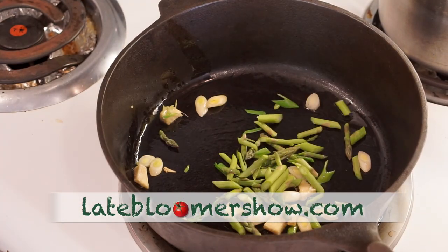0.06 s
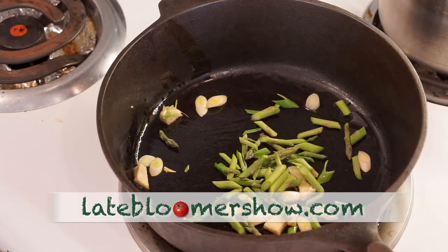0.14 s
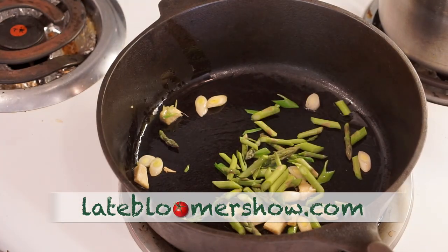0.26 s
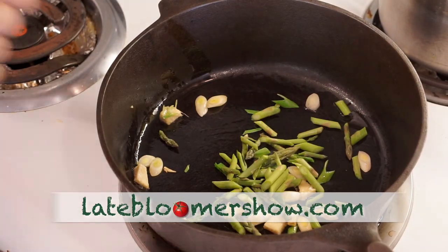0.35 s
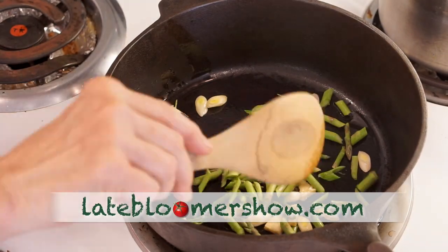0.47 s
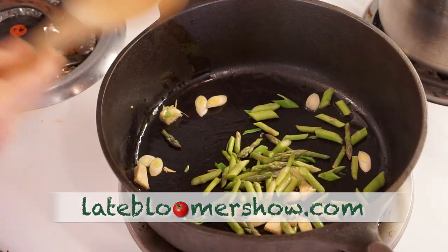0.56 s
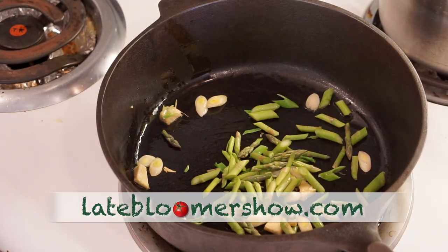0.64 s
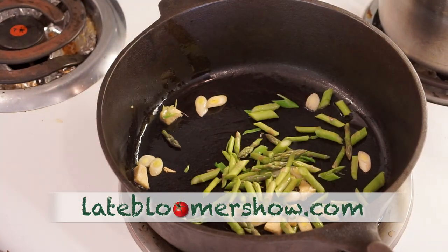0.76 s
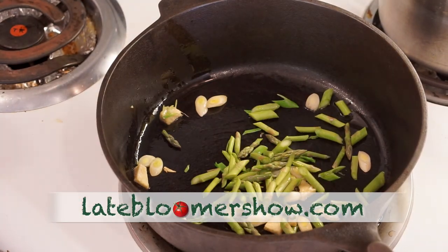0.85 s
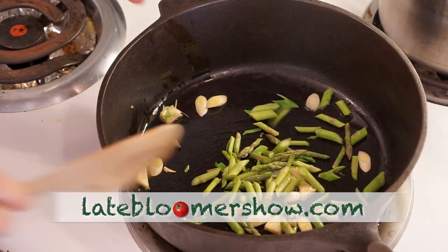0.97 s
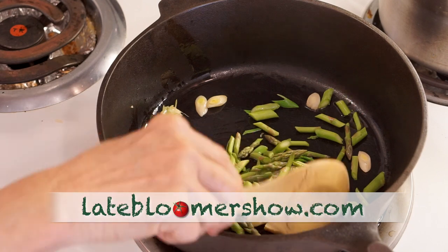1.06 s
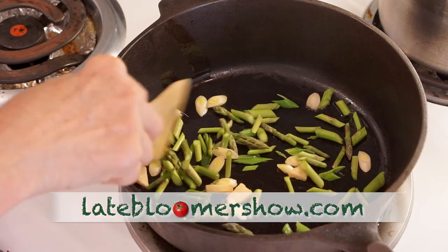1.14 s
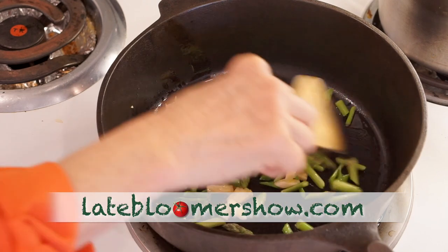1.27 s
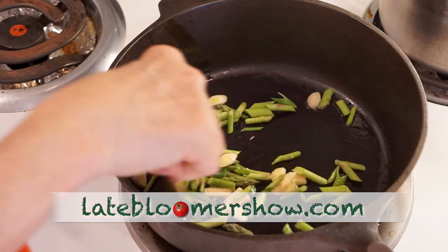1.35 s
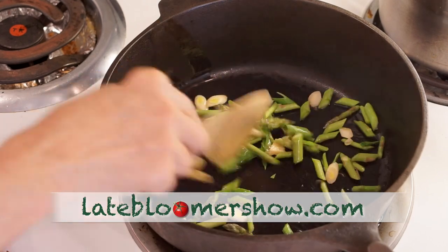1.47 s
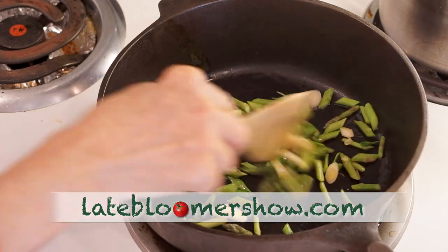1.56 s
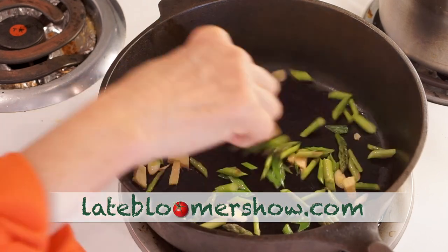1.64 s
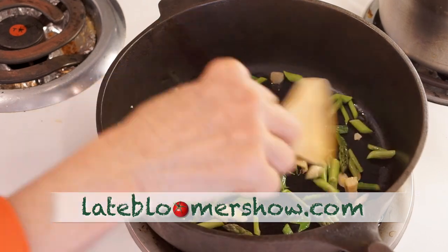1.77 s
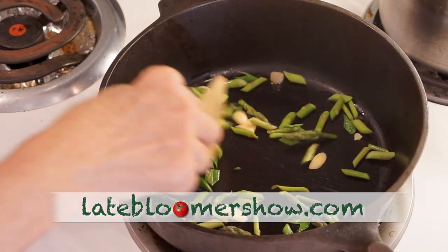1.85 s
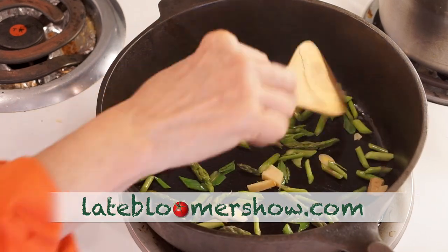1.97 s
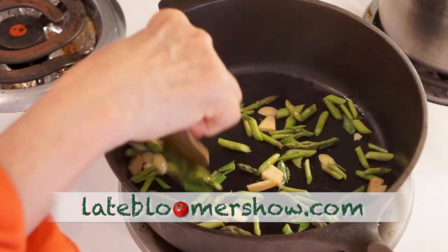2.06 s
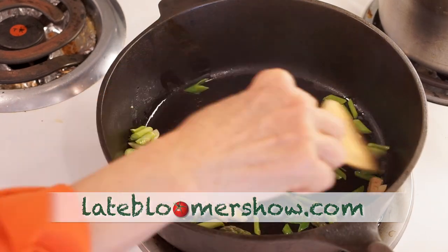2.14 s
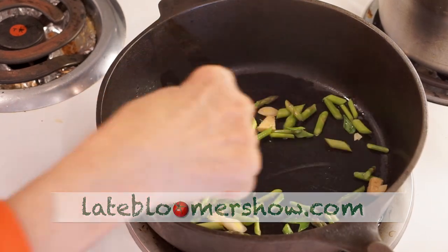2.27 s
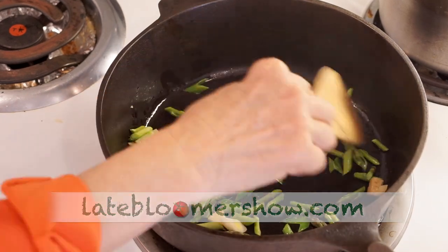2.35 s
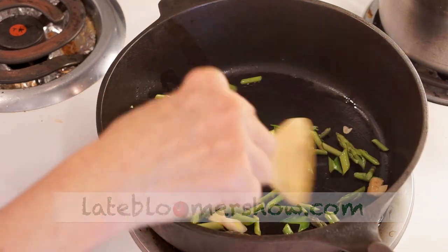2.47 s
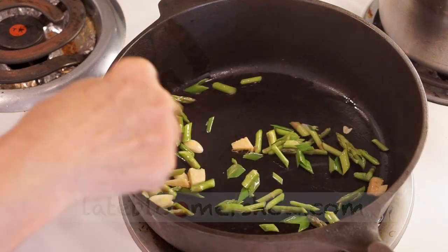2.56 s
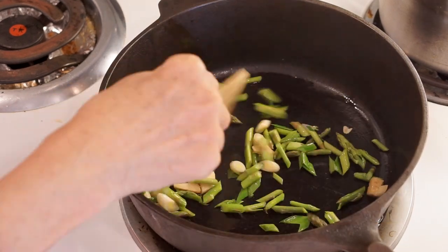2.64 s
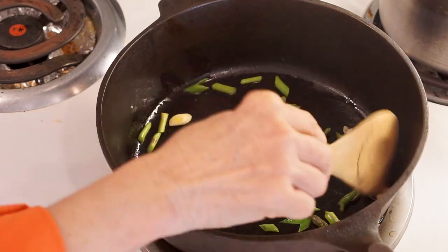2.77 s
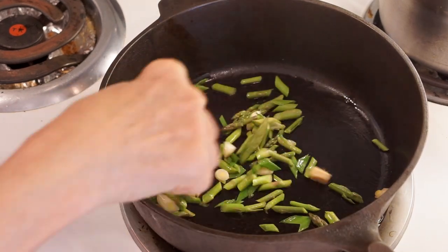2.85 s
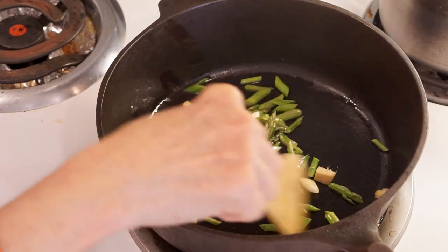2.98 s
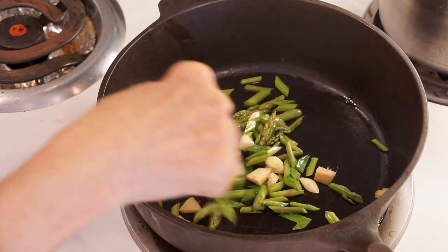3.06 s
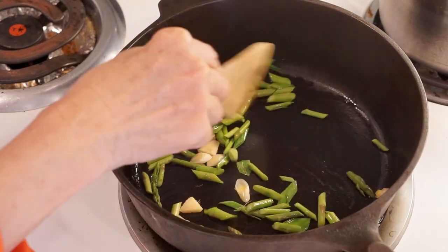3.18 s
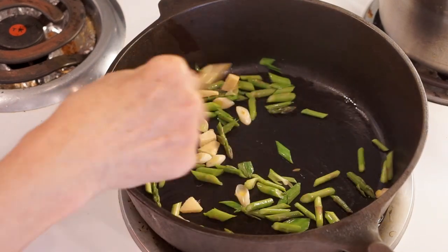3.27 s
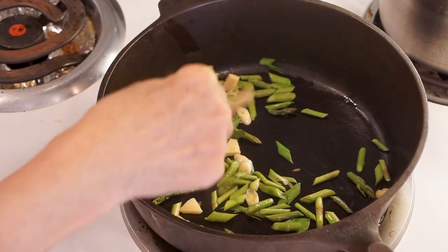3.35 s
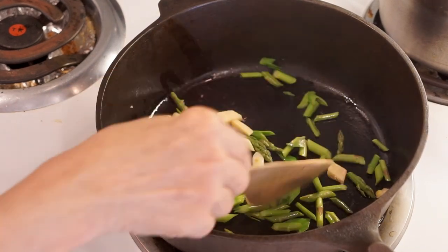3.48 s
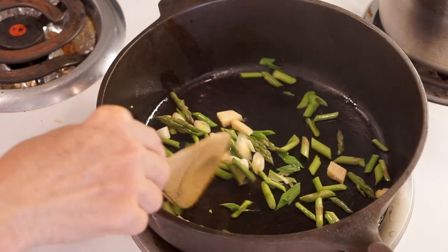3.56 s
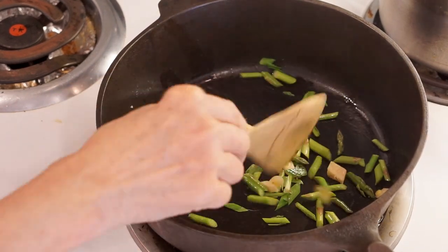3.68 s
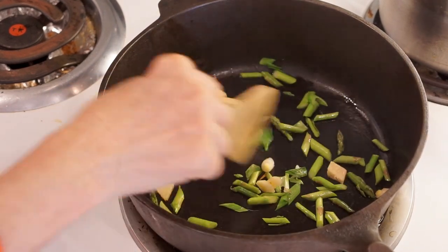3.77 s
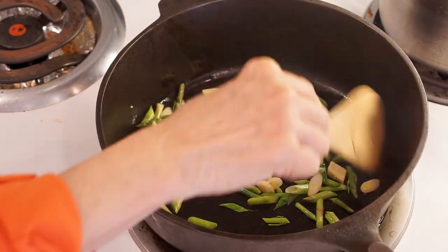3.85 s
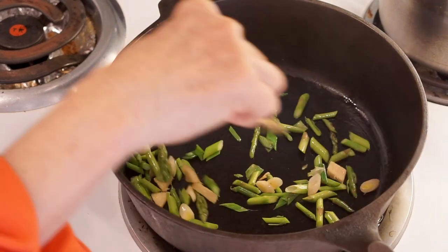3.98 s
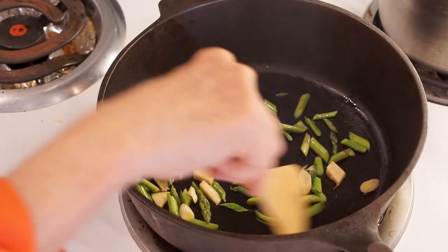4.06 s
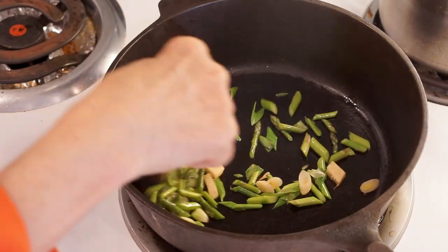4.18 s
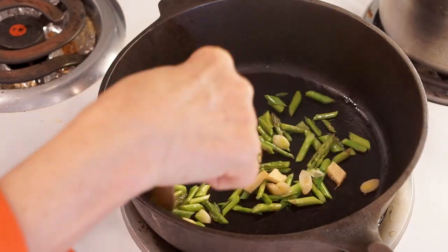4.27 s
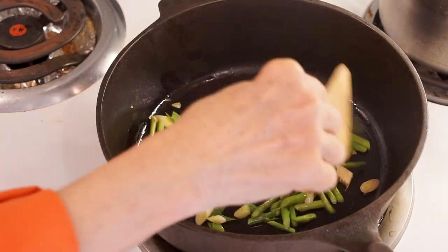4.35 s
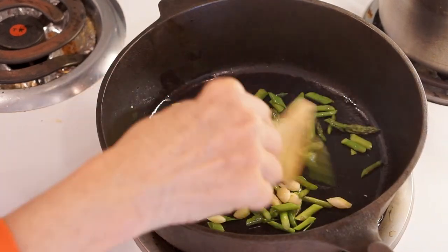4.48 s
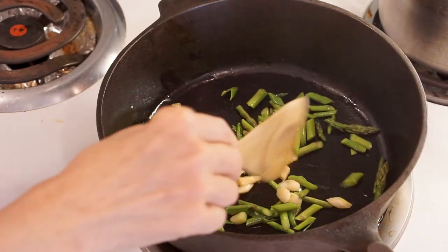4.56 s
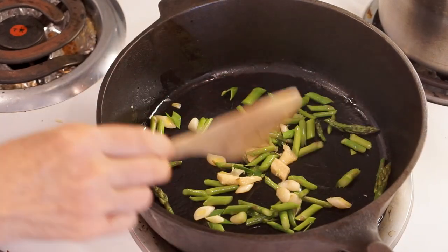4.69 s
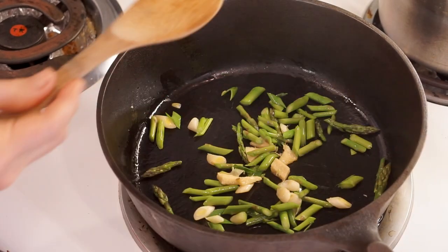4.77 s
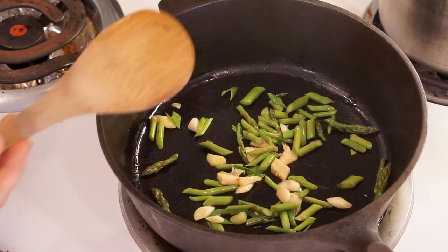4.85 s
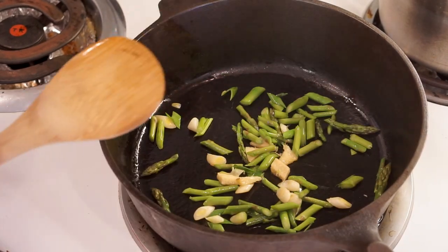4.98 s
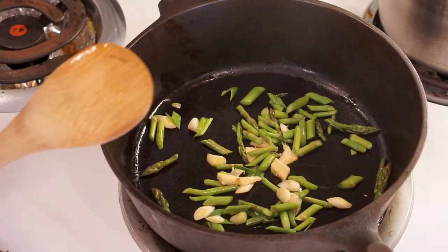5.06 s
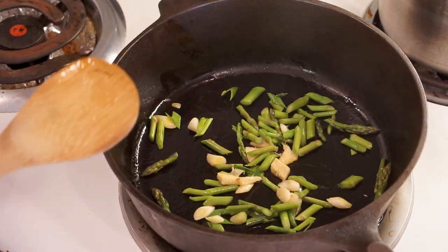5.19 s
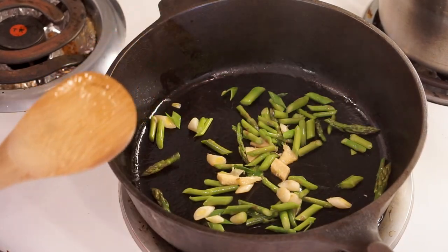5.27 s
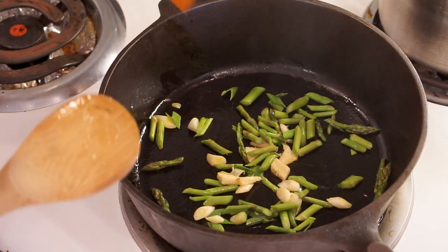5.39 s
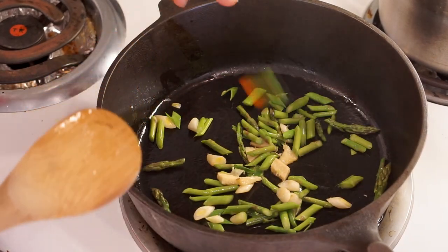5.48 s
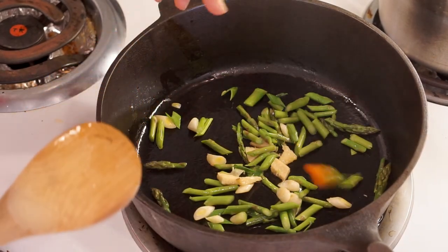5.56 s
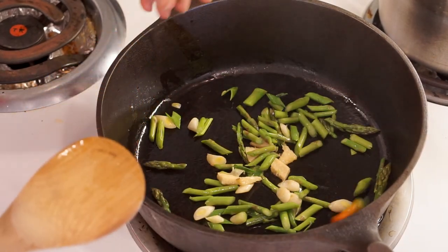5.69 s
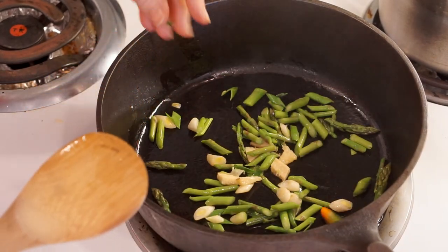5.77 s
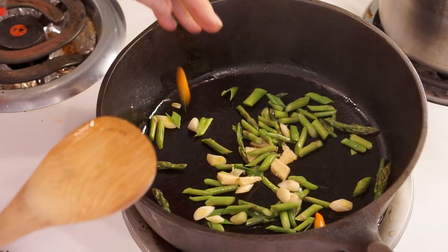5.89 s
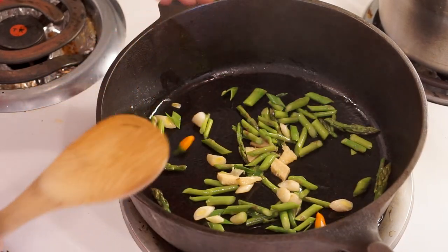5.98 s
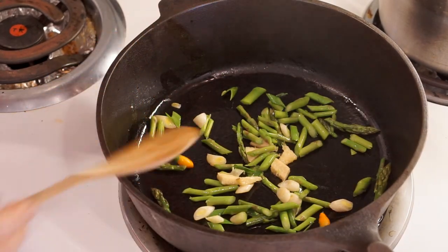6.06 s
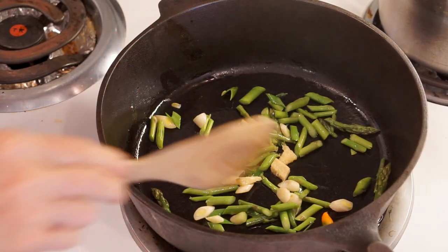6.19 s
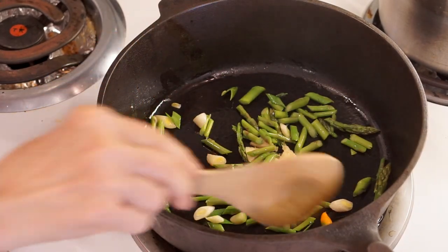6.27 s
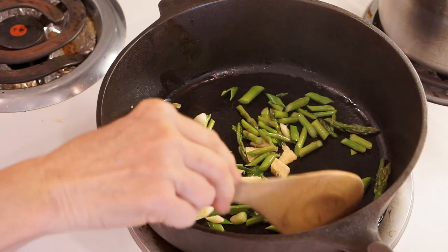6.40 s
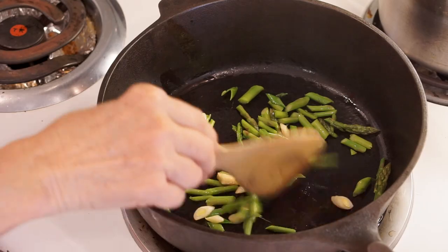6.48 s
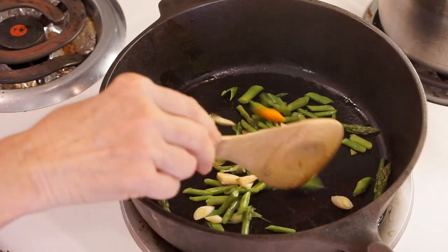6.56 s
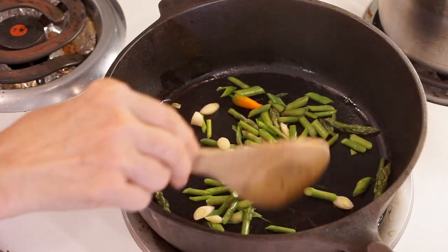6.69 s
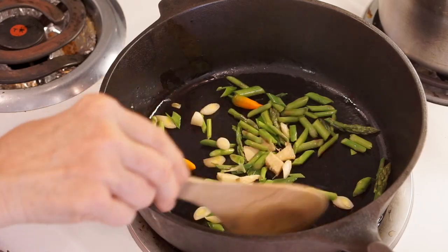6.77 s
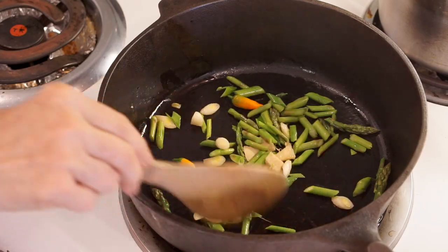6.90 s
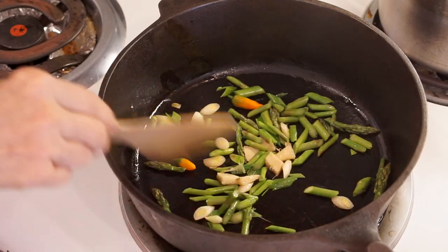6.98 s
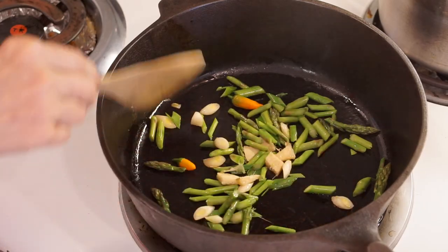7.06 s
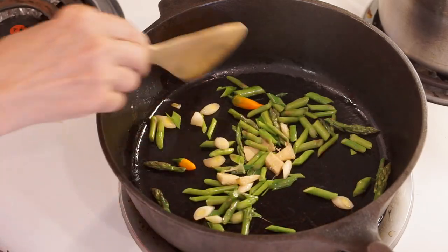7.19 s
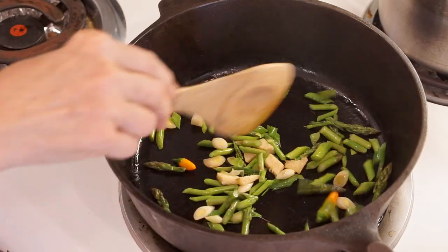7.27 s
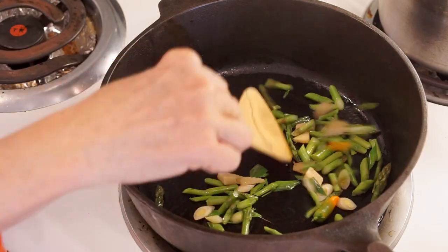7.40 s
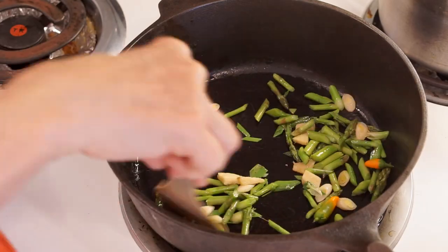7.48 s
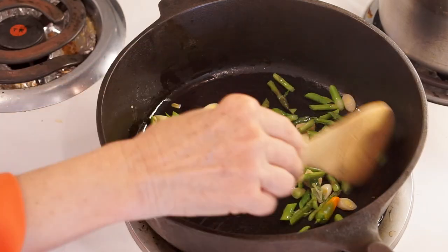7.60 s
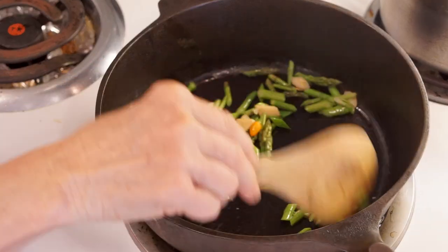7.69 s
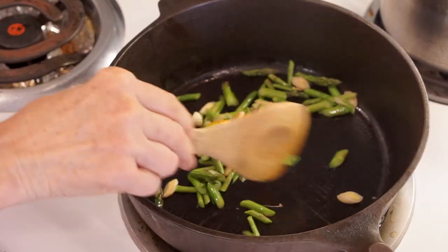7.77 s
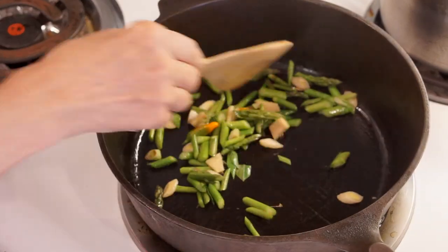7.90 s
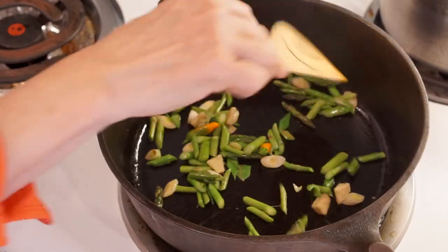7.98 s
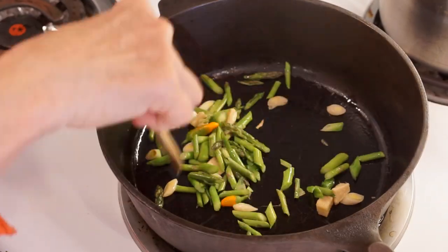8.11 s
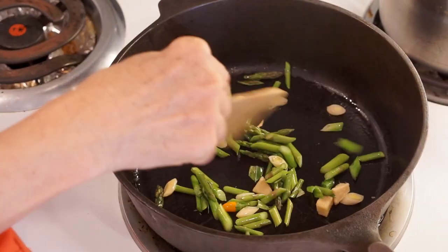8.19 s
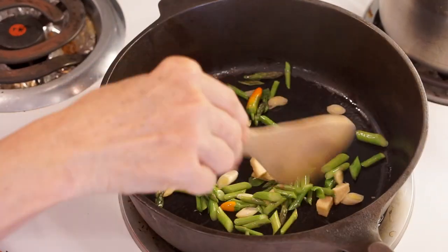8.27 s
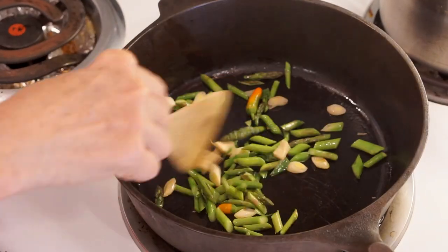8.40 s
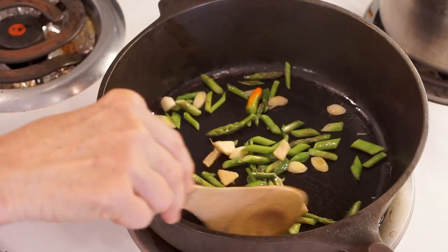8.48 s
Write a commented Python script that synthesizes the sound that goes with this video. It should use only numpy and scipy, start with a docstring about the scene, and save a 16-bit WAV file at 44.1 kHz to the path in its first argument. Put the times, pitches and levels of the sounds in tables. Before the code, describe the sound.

A fine, bright sizzle runs throughout in a small home kitchen, heard from close by. Wood cracks unevenly against heavy iron, with brief ringing and gritty, short scrapes; each push makes the frying swell. Midway the stirring pauses for nearly two seconds, leaving plain sizzling and snapping oil over a very low electric hum. Then a softer knock starts a second bout of clacks, louder hissing and a final scrape and blow.

```python
"""First comes the steady hiss of asparagus and garlic frying in cast iron, close to one microphone.
It is made of countless random bubble bursts; oil spits over it as noise snaps with a short spray.
In two bouts a wooden spatula knocks (noise cracks, ringing pan modes) and scrapes (stick-slip steps
through resonances), and turned pieces hiss louder. Behind it all in the small kitchen an electric stove
hums in sines over low filtered noise; the level of both rises and dips. A limiter holds the level down."""
import sys
import numpy as np
from scipy import signal
from scipy.fft import rfft, irfft
from scipy.io import wavfile

SR = 44100
rng = np.random.default_rng(int(sys.argv[2]) if len(sys.argv) > 2 else 0)


def waveform_to_disk(signal):
    """Save audio, clipped to [-1, 1], as 16-bit WAV at the path in sys.argv[1]."""
    frames = np.transpose(np.atleast_2d(signal))
    scaled = np.clip(frames, -1, 1) * 32767
    samples = np.round(scaled).astype(np.int16)
    wavfile.write(sys.argv[1], SR, samples)


N = 376613
TIME = np.arange(N) / SR


def gain_of(db):
    """Decibels to amplitude."""
    return 10 ** (np.asarray(db) / 20)


def evened(x):
    """Scales to rms 1."""
    return x / np.sqrt(np.mean(x ** 2) + 1e-20)


def follow(curve):
    """Straight lines through (time [s], value) rows, at every sample."""
    return np.interp(TIME, *np.transpose(curve))


def add(mix, start_s, sound):
    """Mixes a sound in at its start time, cut off at the end of the mix."""
    part = mix[max(round(start_s * SR), 0):][:len(sound)]
    part += sound[:len(part)]


def coloured(x, points, size=4096):
    """Causal minimum-phase filter of unit energy, outlined by (frequency [Hz], level [dB]) rows."""
    hz, db = np.transpose(points)
    grid_hz = abs(np.fft.fftfreq(size, 1 / SR)) + 1
    log_gain = np.log(gain_of(np.interp(np.log(grid_hz), np.log(hz), db)))
    minimum_phase = np.exp(np.conj(signal.hilbert(log_gain)))
    taps = np.fft.ifft(minimum_phase).real[:size // 2]
    return signal.oaconvolve(x, taps / np.linalg.norm(taps))[:len(x)]


def filtered(x, order, edge_hz, kind):
    """Butterworth filter: "high" above one edge, "band" between two."""
    return signal.sosfilt(signal.butter(order, edge_hz, kind, fs=SR, output="sos"), x)


def resonate(x, hz, width_hz):
    """One resonance with gain 1 at its peak."""
    b, a = signal.iirpeak(min(hz, SR / 2 - 1), max(hz / width_hz, .5), fs=SR)
    return signal.lfilter(b, a, x)


def wander(rate):
    """Slow chance swings of rms 1, up to about rate changes a second."""
    lowpass = np.exp(-(np.fft.rfftfreq(N, 1 / SR) / rate) ** 2)
    return evened(irfft(rfft(rng.standard_normal(N)) * lowpass, N))


def room(x, wet_db, t60):
    """Adds the dense early echoes of pan, stove and walls as decaying noise."""
    t = TIME[:SR // 2]
    tail = rng.standard_normal(len(t)) * gain_of(-60 * t / t60) * (t > .001)
    return x + gain_of(wet_db) * signal.oaconvolve(x, tail / np.linalg.norm(tail))[:N]


# level of the hum as heard at the microphone: (time [s], level [dB])
HEARD_HUM_LEVEL = [(0.08, -57.5), (1.38, -73.5), (1.57, -66), (1.73, -74), (1.92, -63), (2.18, -75.5),
                   (3.09, -62.5), (5.86, -58.5), (7.52, -64), (7.91, -63), (8.45, -62.5)]
# lines of the hum: (frequency [Hz], level [dB])
HUM_LINES = [(119.9, -1), (239.5, -6.5), (335, -12), (524, -10), (699, -16), (855, -17)]
# colour of the kitchen's low noise: (frequency [Hz], level [dB per Hz])
KITCHEN_COLOUR = [(25, -28), (50, -20), (65, -18), (90, -23), (155, -19), (190, -5), (230, 0), (270, -9.5),
                  (350, -7), (430, -14.5), (700, -10.5), (1100, -17), (1600, -52), (4000, -22)]


def background():
    """Behind the pan: a steady stove hum over low kitchen noise, the level heard rising and dipping."""
    level_db = follow(HEARD_HUM_LEVEL)
    hum = np.zeros(N)
    for hz, db in HUM_LINES:
        hum += gain_of(db) * np.sqrt(2) * np.sin(2 * np.pi * (hz * TIME + rng.random()))
    # the low noise rises and dips along with the hum, less deeply
    air = coloured(rng.standard_normal(N), KITCHEN_COLOUR) * gain_of(-54.5 + 0.64 * (level_db + 62.0))
    return hum * gain_of(level_db + 2.7 * wander(rate=4.1)) + air


# strokes of the spatula over the bottom: (time of the middle [s], length [s], level [dB])
SCRAPE_STROKES = [(0.613, 0.15, -34.5), (1.493, 0.17, -38), (2.638, .15, -33.5), (2.924, 0.36, -42.5),
                  (3.43, 0.22, -37.5), (4.155, 0.13, -40), (6.662, 0.19, -42), (8.01, 0.055, -53),
                  (8.095, 0.099, -35.5)]
# resonances of the spatula pressed on the iron: (frequency [Hz], width [Hz], level [dB])
PRESSED_RESONANCES = [(614, 13, 4.5), (825, 24, 4), (1078, 68, -3), (1236, 29, 5.5), (2130, 420, -9)]


def scrapes():
    """The wooden edge sticks and slips in quick uneven steps that drive the bottom of the pan."""
    slips = rng.standard_normal(N) * (rng.random(N) < 600 / SR)  # about 600 a second
    slips = slips * gain_of(2.5 * wander(rate=24))
    rub = evened(sum(gain_of(db) * resonate(slips, hz, width) for hz, width, db in PRESSED_RESONANCES))
    pressure = np.zeros(N)
    for middle, length, db in SCRAPE_STROKES:
        pressure += gain_of(db) * np.exp(-5.6 * ((TIME - middle) / length) ** 2)
    return filtered(rub * pressure, 3, 450, "high")


def clack(centre_hz, breadth, t60, count=110):
    """Wood on iron: a dry crack and a small rebound, then short rings of spatula, burner and stove top."""
    t = TIME[:SR // 3]
    crack, rattle = rng.standard_normal((2, len(t)))

    # the clatter: many lines of chance level and phase, with some noise
    ring_hz = np.geomspace(400, 6500, count) * rng.uniform(.97, 1.03, count)
    lines = np.zeros(len(t) // 2 + 1, complex)
    phases = np.exp(2j * np.pi * rng.random(count))
    lines[(ring_hz * len(t) / SR).astype(int)] = rng.uniform(.4, 1, count) * np.sqrt(ring_hz) * phases
    clatter = evened(irfft(lines, len(t))) + .25 * rattle
    tail = gain_of(-60 * t / t60)

    since_rebound = t - rng.uniform(.008, .014)
    rebound = .25 * (since_rebound > 0) * np.exp(-abs(since_rebound) / .003)
    contacts = np.exp(-t / .0035) + rebound
    blow = gain_of(3.5) * crack * contacts + gain_of(-7.5) * clatter * tail

    width_hz = centre_hz * max(breadth, .05)  # the breadth is a share of the centre
    wood = resonate(blow, centre_hz, width_hz) * np.sqrt(SR / np.pi / width_hz)
    # wood is soft: little comes far above the clack's centre
    wood = filtered(wood, 3, [420, min(1.95 * centre_hz, SR / 3)], "band")
    stove = evened(filtered(clatter, 2, [400, 1400], "band")) * tail * (1 - np.exp(-t / 0.056))
    return gain_of(-2.5) * wood + gain_of(-10.5) * stove


# modes of the pan: (frequency [Hz], level [dB], t60 before damping by the spatula [s],
# part [0 = pan on its burner, 1 = bottom plate, 2 = rim, 3 = wall])
PAN_MODES = [(364, -12, .4, 0), (592, 0, .42, 0), (655, -7, .4, 0), (815, -19, .3, 1), (1251, 0, .36, 1),
             (2015, -4, .22, 1), (2148, -9, .27, 1), (2523, -13, .3, 1), (3013, -8, .32, 1),
             (1091, -2, 1.2, 2), (2204, -5, .55, 2), (3813, -12, .42, 2), (4058, -9, .22, 2),
             (1453.6, -3, .75, 3), (1568, -10, .55, 3), (1607, -3, 1, 3), (2087, -1, .48, 3),
             (2808, -9, .55, 3), (3620, -6, .42, 3), (4789, -12, .3, 3), (5637, -15, .38, 3),
             (5717, -19, .3, 3), (6700, -19, .2, 3)]
# spatula blows: (time [s], clack level [dB], clack centre [Hz], clack width [share of its centre],
# burner level [dB], bottom plate level [dB], rim level [dB], wall level [dB])
SPATULA_BLOWS = [(.4327, -19, 2140, .83, -34, -41, -44, -35), (0.558, -27, 2430, .2, -64, -44, -65, -65),
                 (.568, -30.5, 2330, 0.22, -59, -32.5, -56, -63),
                 (.7809, -14.5, 2230, 0.48, -46, -44, -29.5, -24),
                 (.826, -14.5, 1830, 1.3, -35, -20, -31.5, -33),
                 (1.35, -36, 2260, 0.48, -57, -61, -48, -70), (1.655, -29, 2520, 0.67, -37, -47, -58, -68),
                 (1.9455, -17.5, 2100, 0.24, -59, -37, -26.5, -28.5),
                 (1.99, -21, 1580, 0.66, -40.5, -21.5, -28, -28),
                 (2.468, -18.5, 2630, 0.91, -36, -51, -41, -40.5),
                 (2.801, -18.5, 2510, 0.037, -27, -38, -59, -49.5),
                 (3.176, -15, 1780, 0.45, -43, -27.5, -35.5, -30.5),
                 (3.2787, -16, 1730, 0.59, -36, -33, -46, -33),
                 (3.395, -29.5, 1900, 0.69, -49, -31, -49, -63),
                 (3.686, -17.5, 1850, 1.3, -34.5, -28, -27.5, -37.5),
                 (3.9915, -18, 2300, 1.3, -23, -37, -46, -54),
                 (4.3413, -18.5, 1970, 0.29, -28, -36, -54, -58),
                 (6.495, -35.5, 1920, 1.5, -54, -50, -45.5, -44),
                 (6.9557, -19.5, 1990, 1.6, -34.5, -29, -20.5, -30.5),
                 (7.2585, -16.5, 1940, 0.31, -34, -32, -26.5, -25),
                 (7.358, -17.5, 1750, 1.2, -35.5, -24, -33, -29.5),
                 (7.987, -27, 1620, 1.7, -58, -36.5, -56, -64),
                 (8.3084, -15.5, 1880, .3, -34, -19.5, -40.5, -50)]
TYPICAL_CLACK_HZ = 1850
RING_TILT_DB = 22.5  # dB per octave of ring, for each octave of clack: a harder blow rings brighter
# clatter length at the typical clack, and the power of the clack's pitch that shortens it
CLATTER_T60_S, CLATTER_SHORTENING = 0.3, 1.56
RESTING_DAMP_DB_PER_S = 13  # the spatula stays on the bottom after a blow and damps plate and burner
TAP_S, TAP_DB, TAP_HZ = 5.197, -41, 750  # one dull tap in the pause


def knocks():
    """Each blow rings the pan's parts according to where it lands; hard blows are bright and clack short."""
    out, t = np.zeros(N), TIME[:SR]
    hz, db, t60, part = np.transpose(PAN_MODES)
    swell = 1 - np.exp(-t * hz[:, None] / 3)  # a mode takes a few cycles to build up
    rings = np.sin(2 * np.pi * hz[:, None] * t) * swell * gain_of(-60 * t / t60[:, None])
    rings = rings * gain_of(-RESTING_DAMP_DB_PER_S * t * (part[:, None] <= 1))
    for start, clack_db, centre_hz, breadth, *parts_db in SPATULA_BLOWS:
        hardness = centre_hz / TYPICAL_CLACK_HZ
        tilt_db = RING_TILT_DB * np.log2(hardness) * np.log2(hz / 1500)
        mode_db = db + np.take(parts_db, part.astype(int)) + tilt_db + rng.standard_normal(len(hz))
        weights = gain_of(mode_db) * rng.choice([-1, 1], len(hz))
        add(out, start, weights @ rings)
        clatter_t60 = CLATTER_T60_S / hardness ** CLATTER_SHORTENING
        add(out, start, gain_of(clack_db) * clack(centre_hz, breadth, clatter_t60))
    add(out, TAP_S, gain_of(TAP_DB) * clack(TAP_HZ, breadth=0.64, t60=0.21))
    return out


# spits of hot oil at set times: (time [s], level [dB])
SET_SPITS = [(0.1218, -10.5), (.334, -14.5), (.57, -11), (0.6826, -15), (1.1963, -17.5), (1.252, -12),
             (2.114, -15), (2.2818, -13), (2.702, -15), (3.123, -15.5), (3.542, -10.5), (4.615, -16.5),
             (4.83, -20), (5.0785, -14), (5.328, -16), (5.6423, -19.5), (6.087, -17.5), (7.2015, -9.5),
             (8.1695, -12)]
# colour of the spits: (frequency [Hz], level [dB per Hz])
SPIT_OUTLINE = [(300, -9), (1200, 1), (2500, 1), (4500, 5), (6500, 2.5), (9000, 7), (16000, 1)]
# more spits come at random, this far above the hiss, give or take the spread
RANDOM_SPITS_PER_S, RANDOM_SPIT_DB, RANDOM_SPIT_SPREAD_DB = 4.1, 17.5, 3
# low cut of a spit of that level: the smaller the drop, the higher
SPIT_HZ, SPIT_DB, SPIT_DB_PER_OCTAVE = 2320, -15, 11
# decay of a spit's snap and of its spray, and the spray's level beside the snap
SNAP_S, SPRAY_S, SPRAY_DB = 0.00037, 0.012, -16.5


def spits(hiss_db):
    """A water drop explodes in the oil: a sharp snap, then a short spray of droplets."""
    out, t = np.zeros(N), TIME[:SR // 7]
    wait, size = rng.random((96, 2)).T
    random_s = np.cumsum(-np.log(1 - wait)) / RANDOM_SPITS_PER_S
    random_db = np.interp(random_s, TIME, hiss_db) + RANDOM_SPIT_DB + RANDOM_SPIT_SPREAD_DB * (2 * size - 1)
    for start, db in list(SET_SPITS) + list(zip(random_s, random_db)):
        snap, spray, clumps = rng.standard_normal((3, len(t)))
        snap = snap * np.exp(-t / SNAP_S)
        snap = 2.8 * snap / np.linalg.norm(snap)
        spray = gain_of(SPRAY_DB) * spray * np.sqrt(abs(clumps)) * np.exp(-t / SPRAY_S)
        low_hz = SPIT_HZ * 2 ** ((SPIT_DB - db) / SPIT_DB_PER_OCTAVE)
        spit = filtered(snap + spray, 2, min(low_hz, SR / 3), "high")
        add(out, start + 0.00089, gain_of(db) * spit)
    return room(coloured(out, SPIT_OUTLINE), wet_db=-17.5, t60=0.18)


FLARE_S, SETTLE_S = 0.065, 0.044  # rise of a turned piece's hiss, and its decay once the piece lies still


def flare(start, end):
    """The hiss rises quickly, holds while the pieces move and then settles."""
    return np.clip((TIME - start) / FLARE_S, 0, 1) * np.exp(-np.maximum(TIME - end, 0) / SETTLE_S)


# hiss of pieces left alone, a little lower around the ends of the pause: (time [s], level [dB])
SIMMER_COURSE = [(0, -37.5), (4.3, -41), (4.68, -40.5), (5, -38.5), (5.7, -38.5), (6.25, -40.5), (6.5, -38)]
# the two bouts of stirring: (start [s], end [s])
STIRRING_BOUTS = [(.55, 4.5), (6.38, 10)]
# pushes that turn fresh, wet faces onto the hot iron: (start [s], length [s], level of the hiss [dB])
TURNING_PUSHES = [(0.52, 0.25, -44), (.85, 0.34, -32.5), (1.073, 0.17, -37), (1.478, 0.35, -31),
                  (2.11, 0.15, -33), (2.42, .29, -36), (3.35, 0.19, -31), (3.75, .22, -34),
                  (3.982, 0.269, -27.5), (4.266, 0.16, -30.5), (4.429, .11, -29.5), (6.433, 0.66, -31),
                  (7.187, 0.039, -27), (7.397, 0.52, -30), (7.917, 0.83, -31)]
STIRRING_DB = -40.5  # the hiss of pieces kept on the move
FLUTTER_DB, FLUTTER_PER_S = 0.46, 12  # chance swings of the hiss


def frying():
    """Level of the hiss in dB: powers add up from a slow simmer, the stirring and a flare for every push."""
    simmer = gain_of(follow(SIMMER_COURSE)) ** 2
    stirring = sum((gain_of(STIRRING_DB) * flare(start, end)) ** 2 for start, end in STIRRING_BOUTS)
    pushes = sum((gain_of(db) * flare(start, start + length)) ** 2 for start, length, db in TURNING_PUSHES)
    return 10 * np.log10(simmer + stirring + pushes) + FLUTTER_DB * wander(rate=FLUTTER_PER_S)


def bursts(per_s, spread_db, count=24):
    """Tiny steam bubbles burst at random: most are small, each rings a few cycles at its own pitch."""
    at = np.flatnonzero(rng.random(N) < per_s / SR)
    size_db = spread_db * np.minimum(rng.exponential(1, len(at)), 3.7)
    sizes = gain_of(size_db) * rng.choice([-1, 1], len(at))
    kinds = rng.integers(0, count, len(at))
    t, out = TIME[:128], np.zeros(N + 128)
    for kind, hz in enumerate(np.linspace(1500, 16000, count)):
        chosen = kinds == kind
        size = sizes[chosen, None]
        ring = np.sin(2 * np.pi * hz * t) * np.exp(-t / .00013)
        splash = 0.38 * rng.standard_normal((len(size), len(t))) * np.exp(-t / 0.00035)
        np.add.at(out, at[chosen, None] + np.arange(len(t)), size * (ring + splash))
    return evened(out[:N])


# colour of the hiss while stirred: (frequency [Hz], level [dB per Hz])
STIRRED_COLOUR = [(100, -83), (300, -21), (800, -10), (1500, -8), (2500, -3), (3800, -3.5), (6000, -6),
                  (8000, 1.5), (11000, 1), (14000, 5), (16000, -1.5)]
# colour of the hiss at rest: (frequency [Hz], level [dB per Hz])
RESTING_COLOUR = [(300, -36), (800, -5.5), (1500, -10), (2300, -2), (3800, -3), (6000, -6.5), (8000, 0),
                  (10000, 0.5), (12000, -1), (16000, 0.5)]


def sizzle(level_db):
    """A wash of countless bubbles with crackles on top; turned pieces hiss brighter and crackle more."""
    stirred = np.clip((level_db + 39) / 7, 0, 1)  # 0 = at rest, 1 = fully stirred
    fizz = evened(bursts(per_s=7000, spread_db=4.5) + gain_of(-1) * rng.standard_normal(N))
    crackle = bursts(per_s=420, spread_db=5) * gain_of(-9 + 3 * stirred)
    # small splashes flare up at once and fade over a few hundredths of a second
    splashes = rng.random(N) * (rng.random(N) < 45 / SR)
    flares = signal.lfilter([1], [1, -np.exp(-1 / (.014 * SR))], splashes)
    flare_gain = gain_of(np.minimum(flares, 1.1) * (2.2 + 2 * stirred))
    steam = evened(room(fizz + crackle, wet_db=-9, t60=.12) * flare_gain) * gain_of(level_db)
    moving = gain_of(-0.22) * coloured(steam * np.sqrt(stirred), STIRRED_COLOUR)
    lying = gain_of(1.0) * coloured(steam * np.sqrt(1 - stirred), RESTING_COLOUR)
    return moving + lying


def scene():
    """Everything reaches the one close microphone, so both channels are alike."""
    hiss_db = frying()
    mono = background() + scrapes() + knocks() + spits(hiss_db) + sizzle(hiss_db)
    return np.array([mono, mono])


EDGE_HZ = 16100  # upper band limit


def record(dry):
    """A limiter lets each crack through, holds down the ring and briefly ducks the hiss; then band limits."""
    power = signal.lfilter([1], [1, -np.exp(-1 / (.002 * SR))], dry[0] ** 2) / (.002 * SR)
    fall = TIME * 50  # recovery in dB a second
    peak_db = np.maximum.accumulate(10 * np.log10(power + 1e-12) + fall) - fall
    over_db = np.maximum(peak_db + 20.0, 0)
    held = dry / gain_of(0.45 * over_db)
    ceiling = gain_of(-7.5)
    rounded = filtered(ceiling * np.tanh(held / ceiling), 2, 70, "high")
    band_limit = signal.firwin(511, EDGE_HZ, window=("kaiser", 9), fs=SR)
    return signal.oaconvolve(rounded, band_limit[None], "same", axes=1)


dry = scene()
out = record(dry)
waveform_to_disk(out)
```